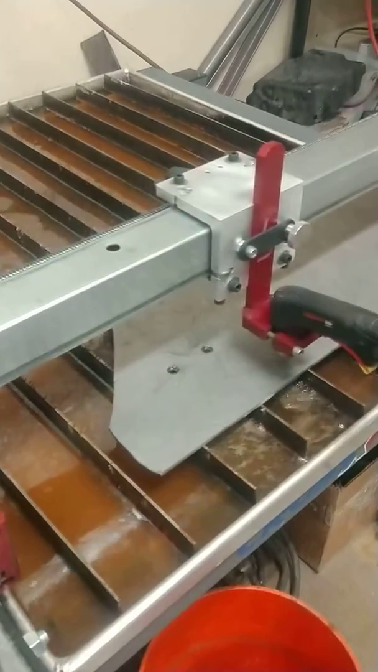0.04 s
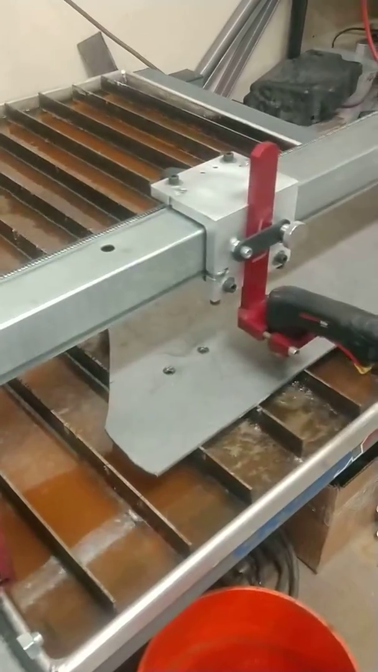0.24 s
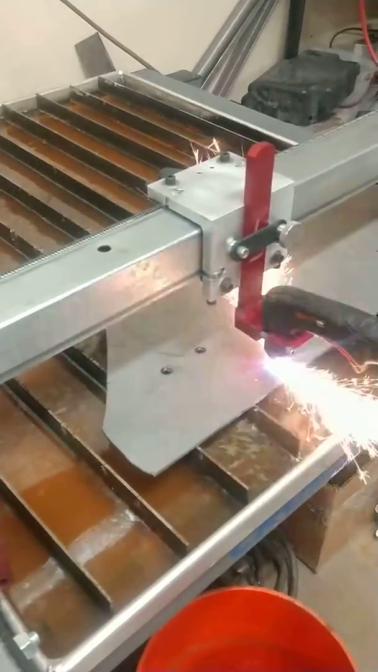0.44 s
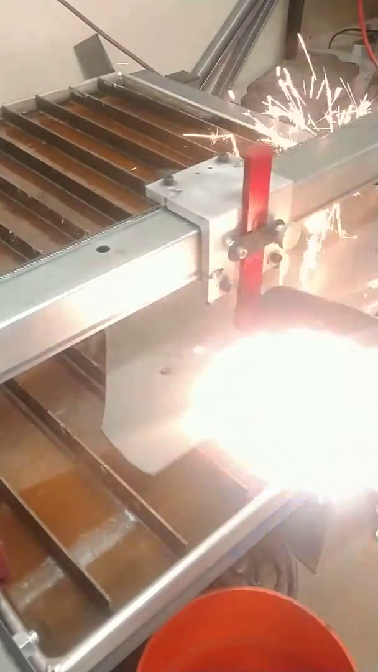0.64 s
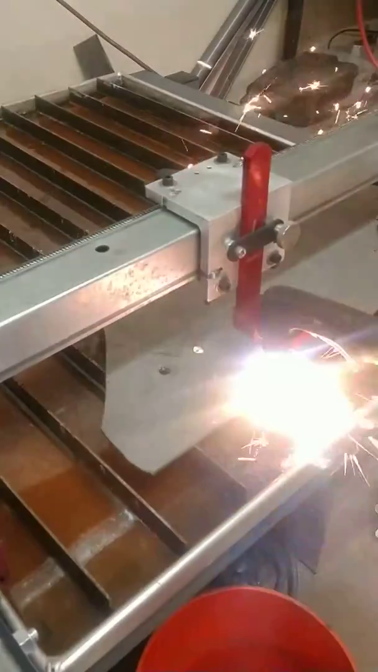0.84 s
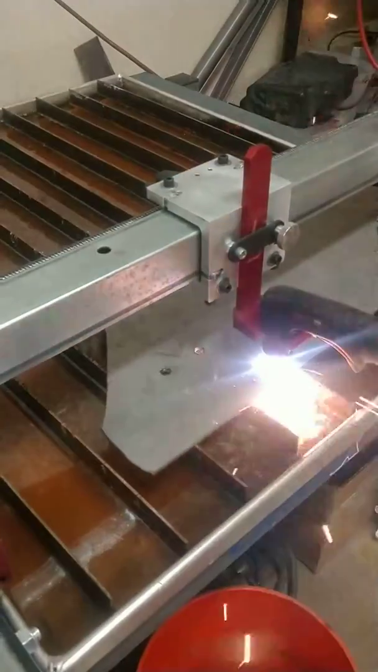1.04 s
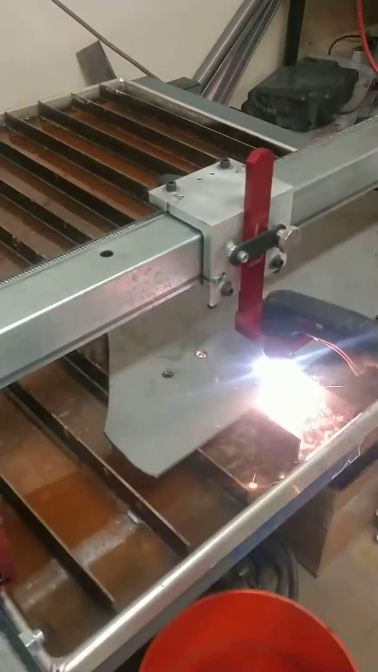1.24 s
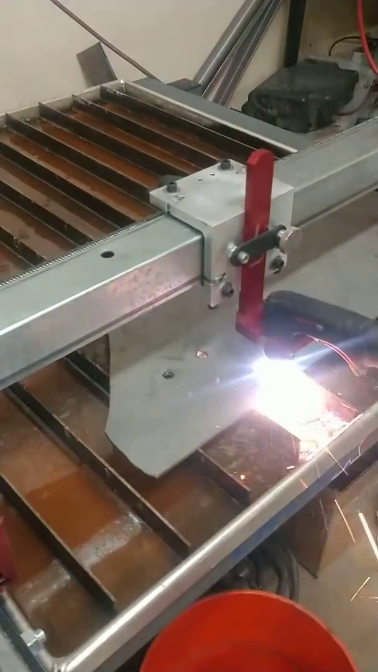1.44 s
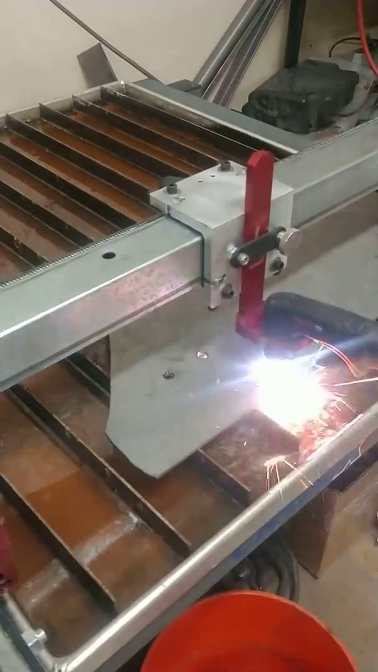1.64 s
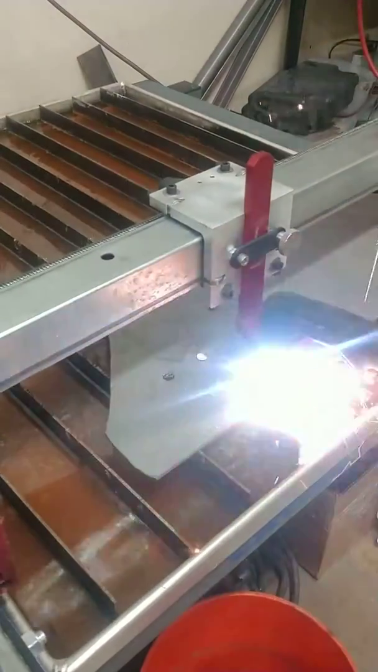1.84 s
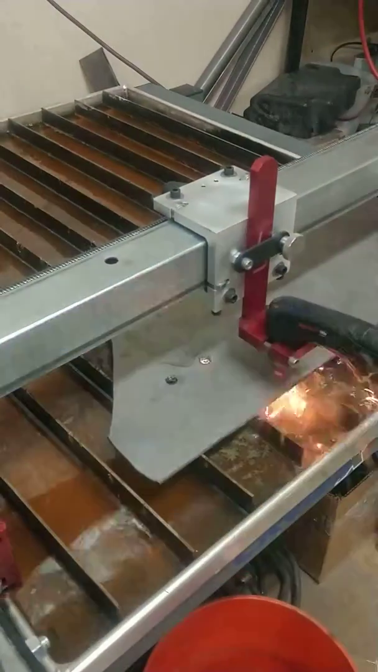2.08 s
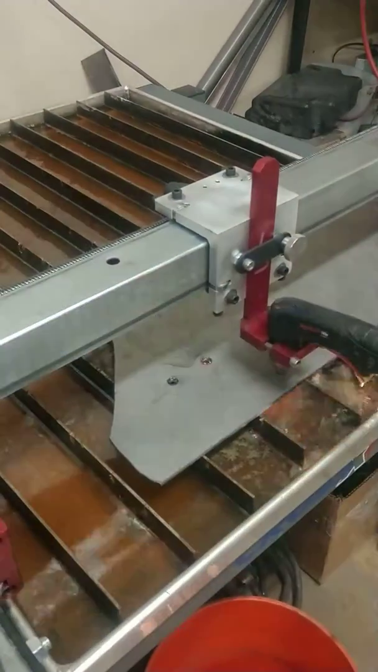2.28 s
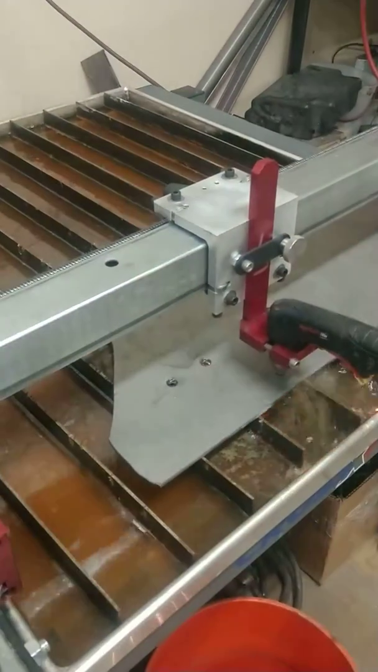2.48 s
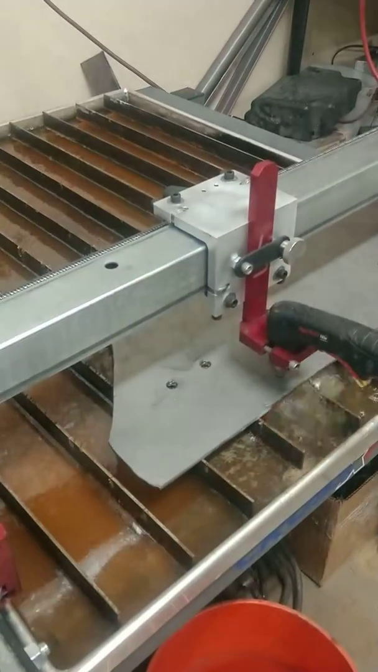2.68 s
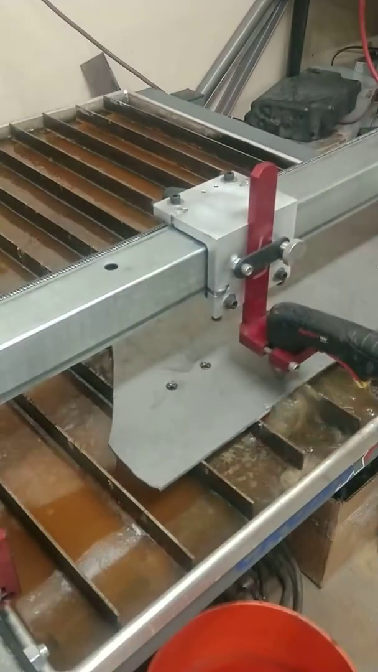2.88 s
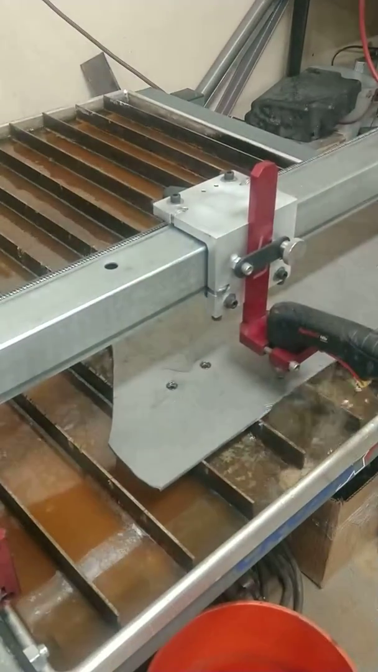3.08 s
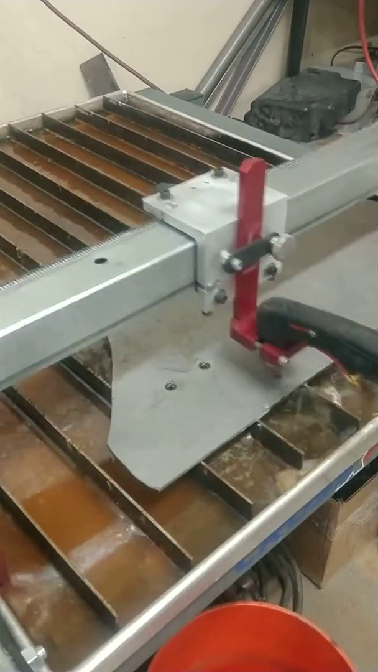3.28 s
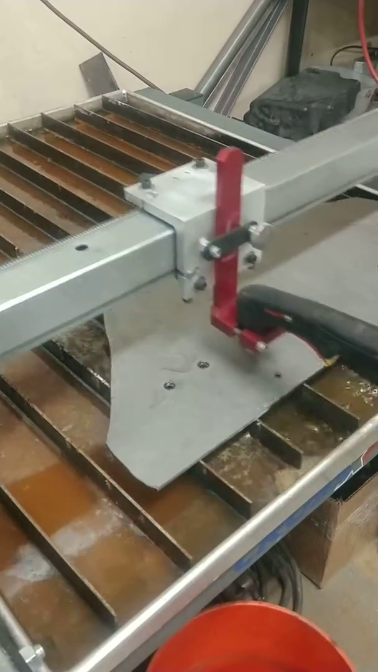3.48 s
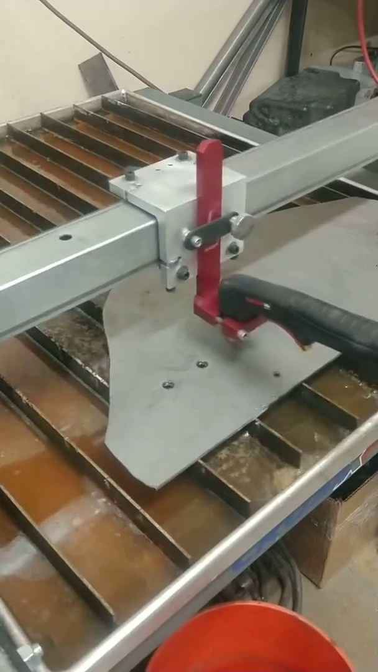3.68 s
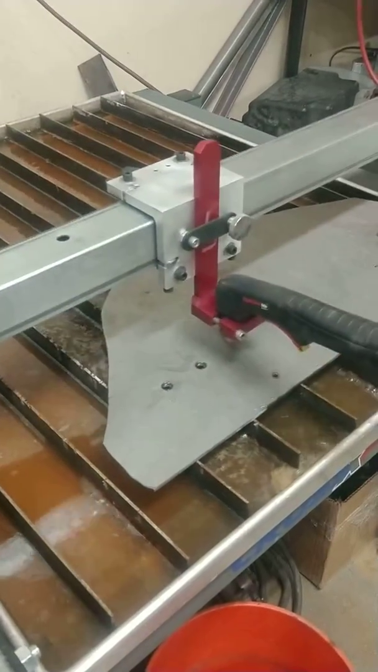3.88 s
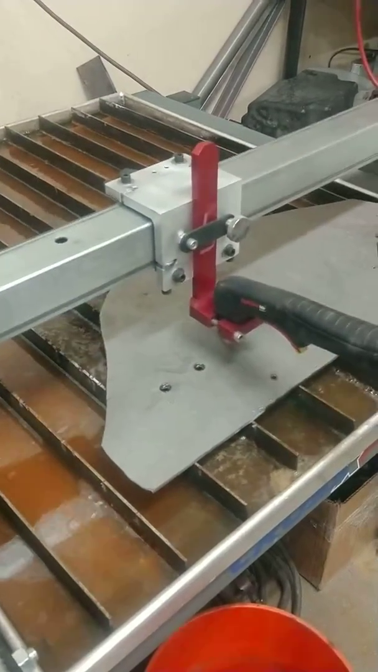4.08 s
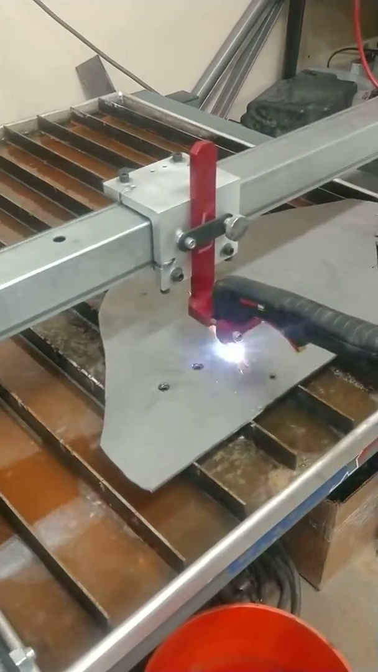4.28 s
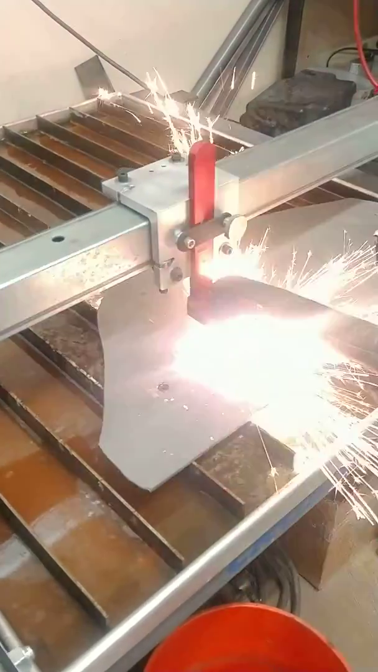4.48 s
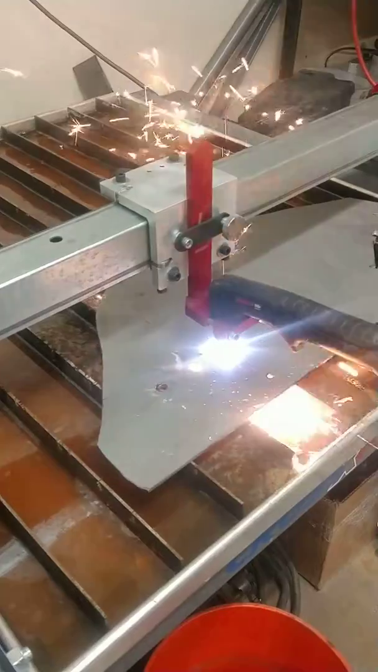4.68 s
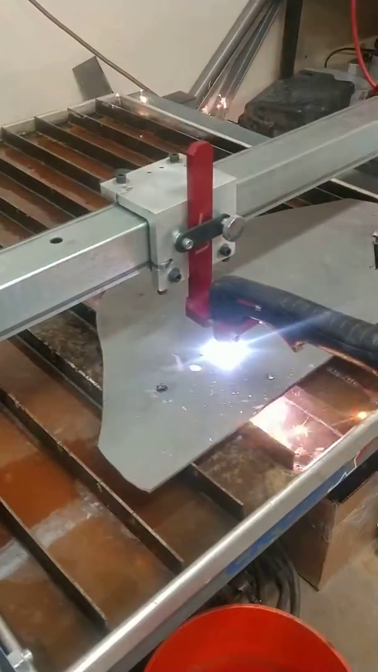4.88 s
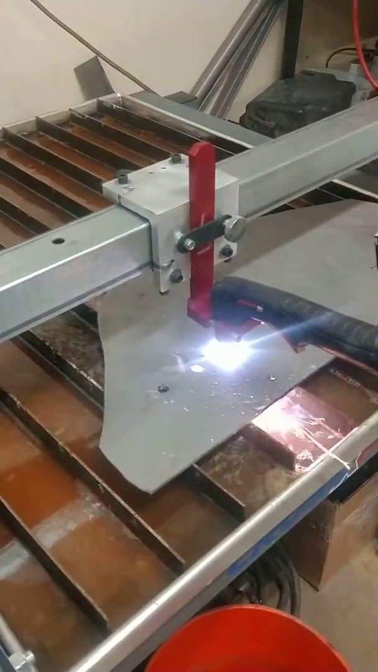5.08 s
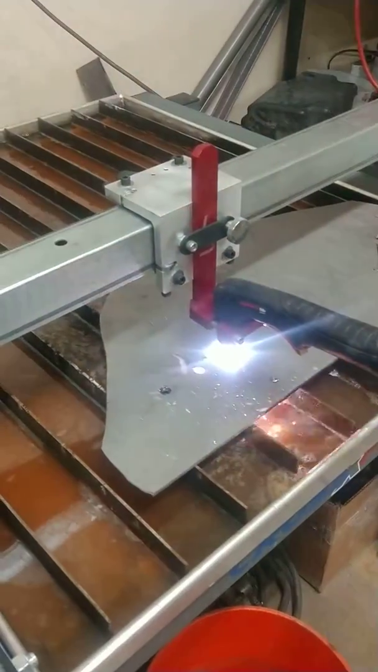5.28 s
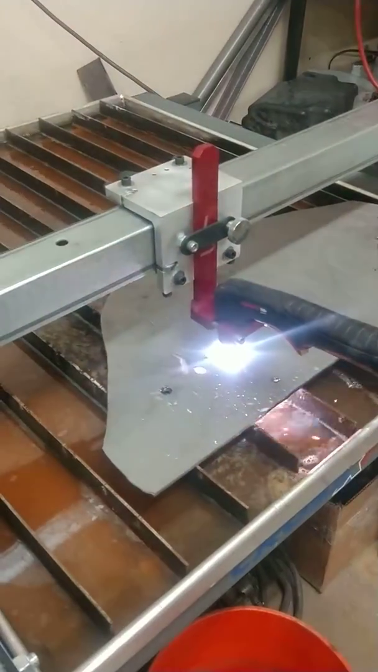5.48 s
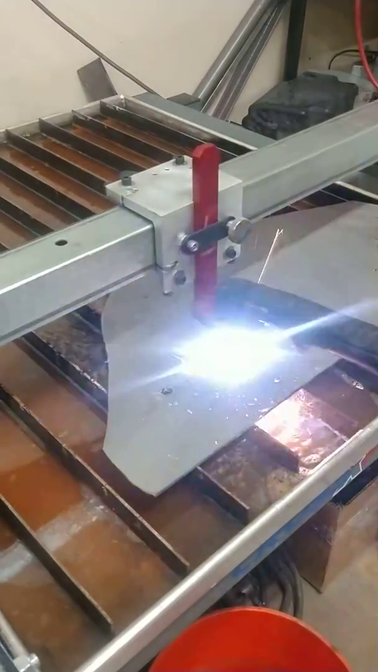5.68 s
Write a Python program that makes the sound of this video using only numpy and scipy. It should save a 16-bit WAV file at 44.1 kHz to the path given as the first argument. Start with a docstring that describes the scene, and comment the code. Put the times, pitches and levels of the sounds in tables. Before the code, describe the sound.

Close, wide stereo in a small workshop: strong, very bright hiss from a torch nozzle, with two short gaps. Each gap ends in a metallic tick, thin puff, crackling snap and brief rising whistle, then fierce sizzling and low rumble. Water in a steel tray churns and gurgles below, more tonal in the second cut. Hum and fan murmur sit quietly behind.

```python
"""A plasma torch on a cutting table pierces and cuts sheet metal over a water tray in a workshop.
Noise makes the air's hiss, which stops twice, and the jet's roar through the cut. Noise and tones that
follow a shared pitch make the water gurgle; short dying tones and noise make the valve and arc sounds.
Behind it are a hum and a murmur. The two channels differ in phase and in part of their noise."""
import sys
import numpy as np
from scipy import signal
from scipy.io import wavfile
from scipy.ndimage import uniform_filter1d

SR = 44100
rng = np.random.default_rng(int(sys.argv[2]) if len(sys.argv) > 2 else 0)


def transcribe(u):
    """Save the signal u as a 16-bit wav file named by the first command-line argument.

    u: samples, shape (n,) or (channels, n), limited to [-1, 1]; the rate is SR.
    q: integer samples, one column per channel.
    """
    v = np.clip(np.atleast_2d(u).T, -1, 1)
    q = np.round(v * 32767).astype(np.int16)
    wavfile.write(sys.argv[1], SR, q)


N = 252693

# Each restart of the torch: air_shuts_s [s], valve_opens_s [s], arc_strikes_s [s]
RESTARTS = [(.125, .4365, .488), (4.07, 4.378, 4.4277)]


def jet():
    """Thin hiss at the nozzle and a fuller, sputtering roar where the jet passes the cut."""
    # The blowing jet: start_s [s], hiss_db [dB], lift of the hiss's treble top_db [dB], roar_db [dB]
    jet_levels = [(0.0, -26.5, 3, -46.5), (.09, -30.5, 4.5, -51.5), (.125, -27, 0, -51.5),
                  (.488, -34, 1, -43), (.506, -29, 9, -38), (.525, -30.5, 2, -33.5), (.57, -27.5, -4, -30),
                  (.88, -26.5, -3.5, -38), (1.03, -28, 4.5, -35), (1.2, -30, 2.5, -43.5),
                  (1.25, -26, 3.5, -35.5), (1.34, -27.5, 0.5, -42), (1.5, -27, 4, -34.5),
                  (1.6, -28, 3, -40), (1.86, -26, 4, -32.5), (2.12, -24, 4, -40.5),
                  (2.18, -20.5, -0.5, -41), (2.22, -31.5, 0, -50), (2.94, -25.5, 0.5, -42.5),
                  (3.19, -26, -1, -38.5), (3.26, -26.5, 1.5, -49.5), (3.33, -25, -1.5, -40),
                  (3.45, -27.5, 2.5, -49), (4.07, -27, 1.5, -49.5), (4.43, -36, 2.5, -41),
                  (4.452, -33, 9, -33.5), (4.475, -33.5, 5, -32), (4.526, -31, 5, -32),
                  (4.85, -28.5, -0.5, -39.5), (5.2, -24, 2, -35.5), (5.3, -26, 2.5, -40),
                  (5.43, -28.5, 1.5, -43), (5.61, -28, 3.5, -38.5), (5.73, -32, 6, -39.5)]
    # Tone colour of the hiss: frequency_hz [Hz], relative density_db [dB per Hz]
    hiss_color = [(1500, -61), (3000, -19), (6000, -10), (9000, -8), (12000, -6.5), (14000, -6),
                  (15500, -0.5)]
    # Tone colour of the roar: frequency_hz [Hz], relative density_db [dB per Hz]
    roar_color = [(150, -15), (500, 0.5), (1200, 2.5), (1800, 1), (2500, -1.5), (3500, -2.5), (6000, -3.5),
                  (10000, -14), (15500, 1.5)]
    hiss_db, top_db, roar_db = curve(jet_levels)
    hiss_db = paused(hiss_db, fall_db_per_s=230, opening_db=-57, ready_db=-42)
    roar_db = paused(roar_db, fall_db_per_s=90, opening_db=-64, ready_db=-57)

    hiss = turbulence(hiss_color, (6000, 15700), patchy_db=1.6734, flicker_db=0.1, size=256)
    top = signal.sosfiltfilt(signal.butter(2, 12000, "high", fs=SR, output="sos"), hiss)
    tilted_hiss = hiss - top + gain_of(top_db) * top
    roar = turbulence(roar_color, (2600, 4200), patchy_db=3.0, flicker_db=0.0, size=256)
    return gain_of(hiss_db) * tilted_hiss + gain_of(roar_db) * roar


def arc_snaps():
    """Each arc strike is a very short pressure snap with a noisy crackle and a slower low push."""
    # Arc strikes: start_s [s], snap_db [dB], crackle_db [dB], push_db [dB]
    snap_hits = [(.4884, -13, -13, -14), (4.4281, 3.5, -12, -15)]
    snap_s, push_s = .00004, .0007
    crackle_hold_s, crackle_t60_s = .0007, .002  # t60: the time to die away by 60 dB
    out, t = np.zeros(N), np.arange(SR // 3) / SR
    for start_s, snap_db, crackle_db, push_db in snap_hits:
        snap = gain_of(snap_db) * (1 - t / snap_s) * np.exp(-t / snap_s)
        fading_db = crackle_db - 60 * np.maximum(t - crackle_hold_s, 0) / crackle_t60_s
        bright_noise = evened(np.gradient(rng.standard_normal(len(t))))
        push = gain_of(push_db) * (1 - t / push_s) * np.exp(-t / push_s)
        add(out, start_s, snap + gain_of(fading_db) * bright_noise + push)
    return out


def arc_whistles():
    """The nozzle whistles briefly as the arc takes: noise in a narrow rising band and its octave."""
    # Whistles: start_s [s], length_s [s], from_hz [Hz], to_hz [Hz], level_db [dB]
    whistle_notes = [(0.492, 0.054, 4826, 6081, -26.5), (4.439, 0.04913, 4680, 5990, -27.5)]
    out = np.zeros(N)
    for start_s, length_s, from_hz, to_hz, level_db in whistle_notes:
        hz = np.linspace(from_hz, to_hz, round(length_s * SR))
        air = rng.standard_normal(len(hz))
        whistle = sum(resonate(resonate(air, k * hz, 480.0), k * hz, 480.0) for k in (1, 2))
        add(out, start_s, gain_of(level_db) * evened(whistle) * np.hanning(len(hz)))
    return out


def arc_pop():
    """A dull pop as the arc goes out: one tone that dies within milliseconds."""
    start_s, level_db, pitch_hz, t60_s = 2.1827, -8, 920, .016
    out, t = np.zeros(N), np.arange(SR // 3) / SR
    add(out, start_s, -gain_of(level_db - 60 * t / t60_s) * np.sin(2 * np.pi * pitch_hz * t))
    return out


def valve():
    """The air valve ticks open and thuds shut, ringing in several tones; each opening gives a thin puff."""
    # The valve clicks home and bounces: start_s [s], level_db [dB]
    opening_ticks = [(.4427, -33.5), (.4475, -49), (4.384, -34), (4.3885, -44.5)]
    # Tones of a tick: pitch_hz [Hz], relative level_db [dB], t60_s [s]
    tick_tones = [(602.5, -6, 0.01), (1490, -6, 0.0107), (2670, -2, 0.009), (3715, -3, 0.0054),
                  (4570, 0, 0.005), (6184, -6.5, 0.00678), (9120, -2, 0.004)]
    # The valve thuds shut: start_s [s], level_db [dB]
    shutting_thuds = [(0.13, -32.5), (4.068, -31)]
    # Tones of a thud: pitch_hz [Hz], relative level_db [dB], t60_s [s]
    thud_tones = [(105, -5, .12), (181, -4.5, 0.4), (325, -10, .15), (487, -4.5, 0.19), (643, -11.5, 0.275),
                  (755.9, -15.5, 0.24), (859, -13, 0.1393)]
    puff_db, puff_t60_s = -44.5, 0.0128
    out, t = np.zeros(N), np.arange(SR // 3) / SR
    for hits, tones in ((opening_ticks, tick_tones), (shutting_thuds, thud_tones)):
        ring = sum(gain_of(level_db - 60 * t / t60_s) * np.sin(2 * np.pi * pitch_hz * t)
                   for pitch_hz, level_db, t60_s in tones)
        for start_s, level_db in hits:
            add(out, start_s, gain_of(level_db) * ring)
    for shuts_s, opens_s, strikes_s in RESTARTS:
        breath = evened(resonate(rng.standard_normal(len(t)), 10440.0, 4066.0))
        add(out, opens_s, gain_of(puff_db - 60 * t / puff_t60_s) * breath)
    return out


def cut_puffs():
    """Single low puffs of air from the cut, each just one cycle of a sine."""
    # Puffs: start_s [s], peak_db [dB], pitch_hz [Hz]
    puff_list = [(1.068, -24.5, 140.2), (1.2687, -15, 150), (1.49, -26, 190), (1.908, -21, 140)]
    out, t = np.zeros(N), np.arange(SR // 3) / SR
    for start_s, peak_db, pitch_hz in puff_list:
        one_cycle = np.sin(2 * np.pi * pitch_hz * t) * (pitch_hz * t < 1)
        add(out, start_s, gain_of(peak_db) * one_cycle)
    return out


def water():
    """The jet blows over a hollow in the water; bubbles burst around its pitch."""
    level_db, hz, clear = hollow()
    clear = np.clip(clear, 0, 1)
    breath, churn = rng.standard_normal((2, N))

    # Clear part: breathy noise plus a wavering tone
    airy = evened(resonate(resonate(breath, hz, 65.0), hz, 280.0))
    waver = 1 + .03 * evened(uniform_filter1d(churn, size=1200))
    tone = np.sin(2 * np.pi * np.cumsum(hz * waver) / SR)
    note = evened(airy + gain_of(-1.5) * tone)

    # Rough part: broad sloshing and bubbles
    slosh = evened(resonate(resonate(churn, hz, 780.0), hz, 907.5))
    bubbles = np.zeros(N)
    for step in np.geomspace(.6, 1.8, num=6):  # six bubble pitches around that of the hollow
        happens = rng.random(N) < 30. / SR  # 30 bursts a second on average
        strength = gain_of(3.9345 * np.minimum(rng.exponential(1, N), 4))
        bursts = happens * strength * rng.choice([-1, 1], N)
        bubbles += resonate(resonate(bursts, step * hz, 61.0), step * hz, 420.0) / step
    rough = evened(slosh + gain_of(-3.5) * evened(bubbles))

    overtone = evened(resonate(resonate(breath, 1.573 * hz, 620.0), 2.2 * hz, 660.0))
    blend = np.sqrt(clear) * note + np.sqrt(1 - clear) * rough
    return gain_of(level_db) * (blend + gain_of(-6.5) * overtone)


def hollow():
    """Level, pitch and clearness of the hollow: whichever gurgle is loudest leads the churning."""
    # Churning under the jet: start_s [s], level_db [dB before the tray], pitch_hz [Hz], clearness [0-1]
    churn_levels = [(0.0, -48, 970, 0.34), (.125, -67.5, 560, 0.1), (.49, -53, 790, 0.27),
                    (.9, -45.5, 893, 0), (1.3, -35.5, 800, 0.1), (2.19, -28, 907, 0), (2.25, -43, 800, 0),
                    (2.45, -42.5, 679, 0.5), (2.9, -46, 849.5, 0.3), (3.05, -38, 938.8, 0),
                    (3.3, -37.5, 963, 0.01), (3.39, -52, 740, 0.35), (4.07, -57, 604.4, 0.28),
                    (4.43, -47, 788, 0.3), (4.7, -37, 662.9, 0.5), (4.82, -36, 688, 0.98),
                    (4.92, -32, 635, 0.8), (5.15, -40.5, 637, .6), (5.4, -31.5, 609.1, 0.1),
                    (5.73, -28, 644.3, 0.55)]
    # Gurgles: peak_s [s], level_db [dB before the tray], pitch_hz [Hz], clearness [0-1],
    # rise_s [s per 10 dB, sign ignored], fall_s [s per 10 dB, sign ignored]
    gurgle_list = [(.142, -50, 521.6, 0.21, 0.35, 0.9), (.63, -33, 885.8, 0.15, -0.09, 0.025),
                   (1.1, -26.5, 1047, 0.16, -0.01, 0.1419), (1.19, -29, 618, 0.41, -0.11, 0.0041),
                   (1.29, -35, 1090, 0.2, -0.0068, 0.4), (1.461, -23, 1093, 0.34, 0.0898, 0.06),
                   (1.55, -21, 819.4, 0.7, 0, 0.01), (1.7, -23.5, 959, 0.3, -0.07, 0.03),
                   (1.83, -27, 962, 0.45, 0.01, 0.0843), (2.03, -24, 794.7, 0.07, -0.01, 0.09),
                   (2.12, -25.5, 1050, 0.33, -0.03, 0.05), (2.185, -23.5, 910.9, 0.19, 0.0158, 0.02),
                   (2.36, -37.5, 899.3, 0.1, 0.0325, 0.0564), (2.54, -32.5, 745, 0.4, -0.1131, -0.03),
                   (2.61, -33, 848.5, 0.41, -0.28, 0.09), (2.68, -35, 800.6, 0.47, -0.23, 0.08),
                   (2.76, -33.5, 848, 0.13, -0.03, 0.0986), (2.985, -25.5, 736, 0.5, 0, 0.03),
                   (3.05, -31, 1046, 0.42, 0.09, 0.03), (3.13, -32, 952.1, 0.22, -0.02, 0.015),
                   (3.185, -30, 720, 0, 0.05, 0.06), (3.3, -33, 1106, 0.26, 0.28, 0),
                   (4.09, -49, 520, 0.3, 0.63, 0), (4.503, -21, 841, 0, 0, 0.1567),
                   (4.98, -19.5, 671.7, 0.88, 0.0255, 0.07), (5.083, -21, 618.6, 0.87, -0.01, 0.03),
                   (5.2, -28, 622, 0.66, -0.002, 0.2), (5.3, -26.5, 625.4, 0.83, 0.08, 0.107),
                   (5.45, -18.5, 496.5, 0.3, 0.0184, 0), (5.53, -18.5, 538, 0.8, 0.05, 0.05),
                   (5.63, -21, 630, 0.45, 0.008, 0.06)]
    churn_db, hz, clear = curve(churn_levels)
    churn_db = paused(churn_db, fall_db_per_s=36, opening_db=-51.5, ready_db=-62)
    power = gain_of(churn_db) ** 2
    # Pitch and clearness are averages weighted by power
    hz, clear = power * hz, power * clear
    for peak_s, level_db, gurgle_hz, gurgle_clear, rise_s, fall_s in gurgle_list:
        more = swell(peak_s, level_db, rise_s, fall_s)
        power = power + more
        hz = hz + more * gurgle_hz
        clear = clear + more * gurgle_clear
    return 10 * np.log10(power), hz / power, clear / power


def tray(x):
    """The steel tray lifts a few fixed pitches of the water sound and is too small to radiate its bass."""
    # Tray resonances: pitch_hz [Hz], width_hz [Hz], relative level_db [dB]
    tray_tones = [(385, 25, -3), (462, 30, 1), (545, 20, 1), (610, 20, 0), (665, 25, -1), (728, 25, -2),
                  (820, 25, -1), (878, 25, -2), (975, 25, -2), (1040, 25, -2), (1199, 25, -2)]
    ringing = sum(gain_of(level_db) * signal.lfilter(*signal.iirpeak(pitch_hz, pitch_hz / width_hz, SR), x)
                  for pitch_hz, width_hz, level_db in tray_tones)
    rung = x + gain_of(6.5) * ringing
    no_bass = signal.butter(4, 390., "high", fs=SR, output="sos")
    return gain_of(-7.5) * signal.sosfilt(no_bass, rung)


def glugs():
    """Air pockets under the sheet glug: each is a soft-edged, fluttering note that bends upward."""
    # Glugs: peak_s [s], level_db [dB], length_s [s], pitch_hz [Hz, at the start]
    glug_notes = [(1.2, -33, .1, 551), (1.54, -32.5, .06, 450), (1.575, -33, .05, 460),
                  (1.778, -37, .06, 455.5), (2.004, -32, .06, 457), (2.42, -46, .07, 399.6),
                  (2.49, -44, .06, 470), (2.59, -39, .05, 1150), (2.744, -46, 0.052, 468),
                  (2.77, -38, .07, 1130), (2.81, -38, .06, 453), (2.98, -34.5, .09, 1130),
                  (3.0, -37, .09, 450), (3.04, -37, .08, 1020), (3.054, -40, .05, 539),
                  (3.118, -40, .05, 455), (3.175, -34, .05, 540), (3.209, -33.5, .09, 450),
                  (3.29, -38.5, .1, 1140), (3.3, -40, .08, 401), (4.98, -35.5, .09, 456),
                  (5.45, -27.5, .07, 465), (5.53, -30, .07, 454), (5.55, -35, .09, 1050),
                  (5.65, -33, .06, 899.7)]
    pitch_rise, flutter_depth = 0.049, 0.42  # shares of the pitch and of the level
    out = np.zeros(N)
    for peak_s, level_db, length_s, pitch_hz in glug_notes:
        progress = np.linspace(0, 1, round(length_s * SR))
        turns = np.cumsum(pitch_hz * (1 + pitch_rise * progress)) / SR + rng.random()
        note = np.hanning(len(progress)) * np.sin(2 * np.pi * turns)
        add(out, peak_s - length_s / 2, np.sqrt(2) * gain_of(level_db) * note)
    flutter = evened(uniform_filter1d(rng.standard_normal(N), size=200))
    return out * (1 + flutter_depth * flutter)


def spits():
    """The water spits: very short tones that start at full level and die at once."""
    # Spits: start_s [s], starting level_db [dB], pitch_hz [Hz]
    spit_list = [(1.093, -16, 906.6), (1.2615, -16, 520), (1.89, -16, 906), (5.444, -10, 703),
                 (5.462, -18.5, 699), (5.63, -7, 754.4)]
    t60_s = 0.011
    out, t = np.zeros(N), np.arange(SR // 3) / SR
    for start_s, level_db, pitch_hz in spit_list:
        add(out, start_s, gain_of(level_db - 60 * t / t60_s) * np.sin(2 * np.pi * pitch_hz * t))
    return out


def table():
    """Low, lumpy rumble of sheet and tray, strongest while the arc drills its hole."""
    # Tone colour of the rumble: frequency_hz [Hz], relative density_db [dB per Hz]
    rumble_color = [(25, -26), (60, -1.5), (100, -6), (140, -1.5), (200, -2.5), (350, -6.5), (600, -8.5),
                    (1000, -35.5)]
    # Lurches of the sheet: peak_s [s], level_db [dB],
    # rise_s [s per 10 dB, sign ignored], fall_s [s per 10 dB, sign ignored]
    lurch_list = [(.02, -49.5, -0.04, 0.2), (.98, -34.5, 0.12, 0.1), (1.56, -36, -0.0143, 0.2),
                  (1.92, -36, 0.4, 0.03), (2.185, -36, 0.12, -0.13), (2.79, -49, 0, -0.1584),
                  (3.7, -48, 0.5, -0.0016), (3.89, -45.5, 0.25, 0.2338), (5.178, -41.5, 0.2, 0.16),
                  (5.418, -43, 0.1, 0.22), (5.624, -45, 0.3, -0.74)]
    # The arc breaks through the sheet, once after each strike: through_s [s]
    break_times = [0.682, 4.621]
    arc_out_s = 2.2  # the first cut ends; the air blows on
    cutting_db, air_only_db = -43, -63
    drilling_db, drill_rise_s, drill_fall_s = -29.5, 0.065, 0.1  # 12 dB up, then 15 dB down

    t = np.arange(N) / SR
    cutting = (t > RESTARTS[0][2]) & (t < arc_out_s) | (t > RESTARTS[1][2])
    steady_db = np.where(cutting, cutting_db, air_only_db)
    steady_db = paused(steady_db, fall_db_per_s=34.4, opening_db=-63, ready_db=-52)
    power = gain_of(steady_db) ** 2 + sum(swell(*lurch) for lurch in lurch_list)
    for (shuts_s, opens_s, strikes_s), through_s in zip(RESTARTS, break_times):
        rising_db = 12 * (t - strikes_s) / drill_rise_s - 12
        falling_db = 15 * (through_s - t) / drill_fall_s
        shape_db = np.minimum(0, np.minimum(rising_db, falling_db))
        power = power + (t > strikes_s) * gain_of(drilling_db + shape_db) ** 2
    return np.sqrt(power) * turbulence(rumble_color, (70, 330), patchy_db=2.5, flicker_db=1.5, size=1024)


def moan():
    """A low moan under the blowing air: a narrow band of breath that sinks in pitch."""
    start_s, length_s, from_hz, to_hz, level_db = 2.5, .42, 329, 265.5, -49
    out = np.zeros(N)
    hz = np.linspace(from_hz, to_hz, round(length_s * SR))
    air = rng.standard_normal(len(hz))
    breath = evened(resonate(resonate(air, hz, 30.), hz, 59.0))
    add(out, start_s, gain_of(level_db) * breath * np.hanning(len(hz)))
    return out


def shop():
    """Steady hum from another side of the shop, over a murmur of fans that differs in each channel."""
    # A machine in the shop: pitch_hz [Hz], level_db [dB]
    hum_tones = [(91.5, -70.5), (118.4, -61.5), (177.6, -60), (234, -64), (279.9, -65), (414.5, -68)]
    # A motor that slows a little: start_s [s], pitch_hz [Hz]
    motor_pitch = [(0, 465), (3.4, 441.4), (5.73, 441.4)]
    # Tone colour of the murmur: frequency_hz [Hz], relative density_db [dB per Hz]
    murmur_color = [(40, -14.5), (80, 1), (150, 2), (400, 1), (1000, -14), (2300, -30), (4400, -21),
                    (8000, -16), (15500, -40.5)]
    motor_db, murmur_db = -60.5, -59
    lead = np.array([[0], [2.1]])  # radians between the channels, before the right is inverted
    t = np.arange(N) / SR
    t = t + 0.0003 * evened(uniform_filter1d(rng.standard_normal(N), size=6000))  # the hum wavers
    hum = sum(np.sqrt(2) * gain_of(level_db) * np.sin(2 * np.pi * (pitch_hz * t + rng.random()) + lead)
              for pitch_hz, level_db in hum_tones)
    motor_turns = np.cumsum(curve(motor_pitch)[0]) / SR
    motor = np.sqrt(2) * gain_of(motor_db) * np.sin(2 * np.pi * motor_turns + lead)
    murmur = [turbulence(murmur_color, (50, 15000), patchy_db=1.5, flicker_db=.6, size=1024)
              for channel in "LR"]
    return hum + motor + gain_of(murmur_db) * np.array(murmur)


def stereo(x):
    """Both channels share one sound, turned in phase on the right; each adds noise of its own."""
    # How unlike the two channels are: frequency_hz [Hz], level_db of the unshared noise
    # [dB against shared sound]
    unshared_levels = [(100, -24), (500, -8.5), (1120, -20.5), (1650, 2.5), (2000, -10), (2080, -66),
                       (2450, -76), (2550, -3.5), (3000, -0.5), (3530, -17), (3950, 5.5), (4180, -6),
                       (4240, -53), (4680, -36), (4780, 16), (5050, -0.5), (6000, 0), (9000, -1),
                       (12000, -4), (15000, -6)]
    # How much louder the left channel is than the right: frequency_hz [Hz], difference_db [dB]
    left_louder = [(100, 2), (400, 3.5), (1200, 0), (4800, 0), (9000, 2.5), (13000, 1.5), (15000, -.5)]
    # Phase between the channels, before the right is inverted: frequency_hz [Hz], phase_cycles [cycles].
    # Over two bands, near 2070-2480 and 4220-4700 Hz, left and right end up as near-exact opposites.
    phase_between = [(0, 0), (172, .1), (517, .28), (1120, .49), (1550, .66), (1980, .95), (2070, 1),
                     (2480, 1), (2700, 1.1), (3015, 1.43), (3530, 1.5), (3960, 1.84), (4220, 2), (4700, 2),
                     (5000, 2.2), (6720, 2.9), (16000, 6.87)]
    wander_hz, wander_frames, wander_bins = 90., 10, 9  # these curves drift a little along the pitch axis

    # Unshared noise: random noise that follows the smeared spectrum of the shared sound
    hz, t, z = signal.stft(x, SR, nperseg=256, noverlap=192)
    keep = gain_of(-120 * t[1] / 0.15)  # its power has a t60 of 0.15 s
    blurred_power = uniform_filter1d(abs(z) ** 2, size=3, axis=0)
    linger = np.sqrt(signal.lfilter([1 - keep], [1, -keep], blurred_power))
    a, b = rng.standard_normal((2, 2) + z.shape)
    unshared = signal.istft(linger * (a + 1j * b), nperseg=256, noverlap=192)[1][:, :N]
    unshared *= np.std(x) / np.std(unshared)

    hz, t, z = signal.stft(np.vstack([x, unshared]), SR, nperseg=1024, noverlap=768)
    shared, only_left, only_right = z
    sway = rng.standard_normal((len(t), len(hz)))
    sway = evened(uniform_filter1d(sway, size=wander_frames, axis=0))
    sway = evened(uniform_filter1d(sway, size=wander_bins, axis=1)).T
    hz = hz[:, None]
    hz = hz + wander_hz * sway * np.minimum(hz / 2000, 1)  # less drift below 2000 Hz
    unlike = gain_of(read(unshared_levels, hz))
    lean = gain_of(read(left_louder, hz) / 2)  # half the difference goes to each channel
    turned = np.exp(-2j * np.pi * np.interp(hz, *np.transpose(phase_between)))
    left = (shared + unlike * only_left) * lean
    right = (shared * turned + unlike * only_right) / lean
    pair = np.array([left, right]) / np.sqrt(1 + unlike ** 2)
    return signal.istft(pair, nperseg=1024, noverlap=768)[1][:, :N]


def turbulence(spectrum, within, patchy_db, flicker_db, size):
    """Noise with drifting patches and a flicker common to all bins; rms one in the band within."""
    hz = np.fft.rfftfreq(size, 1 / SR)
    a, b, patches = rng.standard_normal((4 * N // size + 5, len(hz), 3)).T
    patches = uniform_filter1d(uniform_filter1d(patches, size=6, axis=0), size=16, axis=1)
    flicker = evened(uniform_filter1d(rng.standard_normal(a.shape[1]), size=3))
    level_db = read(spectrum, hz)[:, None] + patchy_db * evened(patches) + flicker_db * flicker
    z = (a + 1j * b) * gain_of(level_db)
    x = signal.istft(z, nperseg=size, noverlap=3 * size // 4)[1][:N]
    band = signal.butter(4, within, "band", fs=SR, output="sos")
    return x / np.std(signal.sosfilt(band, x))


def paused(db, fall_db_per_s, opening_db, ready_db):
    """A level that dies away when the air shuts, then goes from opening to ready level before the arc."""
    ease_s = 0.091  # the line still holds pressure for a moment after the air shuts
    build_s = 0.0341  # pressure builds after the valve opens
    t = np.arange(N) / SR
    for shuts_s, opens_s, strikes_s in RESTARTS:
        dying_db = db[round(shuts_s * SR)] - fall_db_per_s * (np.hypot(t - shuts_s, ease_s) - ease_s)
        db = np.where((t > shuts_s) & (t < opens_s), dying_db, db)
        waiting_db = np.interp(t, [opens_s, opens_s + build_s], [opening_db, ready_db])
        db = np.where((t >= opens_s) & (t < strikes_s), waiting_db, db)
    return db


def swell(peak_s, level_db, rise_s, fall_s):
    """Power of a sound that climbs to a peak and sinks again, 10 dB per rise or fall time."""
    step = 8  # samples that share one value
    late = np.arange(0, N, step) / SR - peak_s
    with np.errstate(divide="ignore", invalid="ignore"):
        below_peak = np.maximum(-late / abs(rise_s), late / abs(fall_s))
    return np.repeat(gain_of(level_db - 10 * below_peak) ** 2, step)[:N]


def resonate(x, hz, width):
    """Shifts the curve hz down to zero, smooths, and shifts back: a resonance of gain 1, width in Hz."""
    turn = np.exp(2j * np.pi * np.cumsum(hz * np.ones(len(x))) / SR)
    r = np.exp(-np.pi * width / SR)
    smooth = signal.lfilter([1 - r], [1, -r], x * turn.conj() + 1e-18)
    return 2 * (turn * smooth).real


def curve(points):
    """Every column after the time column, joined by straight lines sample by sample."""
    t, columns = np.arange(N) / SR, np.transpose(points)
    return [np.interp(t, columns[0], column) for column in columns[1:]]


def read(points, hz):
    """Reads a spectrum on a log-frequency axis."""
    f, value = np.transpose(points)
    return np.interp(np.log(hz + 1), np.log(f + 1), value)


def gain_of(db):
    """Decibels to amplitude."""
    return 10 ** (np.asarray(db) / 20)


def evened(x):
    """Scales to an rms (average strength) of one."""
    return x / np.sqrt(np.mean(x ** 2) + 1e-20)


def add(mix, start_s, sound):
    """Mixes a sound in at a time."""
    part = mix[round(start_s * SR):][:len(sound)]
    part += sound[:len(part)]


def scene():
    """The torch and its table stand near; the shop sounds all around."""
    torch = jet() + arc_snaps() + arc_whistles() + arc_pop() + valve() + cut_puffs()
    wet = tray(water()) + glugs() + spits()
    return stereo(torch + wet + table() + moan()) + shop()


def record(dry):
    """The right channel is wired inverted; the microphones drop the deepest bass; then the band limit."""
    no_deep_bass = signal.butter(2, 55., "high", fs=SR, output="sos")
    wired = signal.sosfilt(no_deep_bass, dry * np.array([[1], [-1]]))
    band_limit = signal.firwin(1023, 15740, window=("kaiser", 4), fs=SR)  # cuts above 15740 Hz
    return signal.oaconvolve(wired, band_limit[None], "same")


dry = scene()
out = record(dry)
transcribe(out)
```